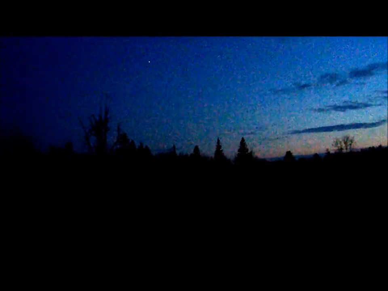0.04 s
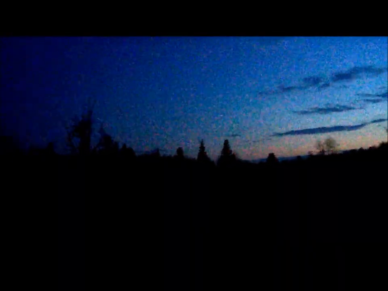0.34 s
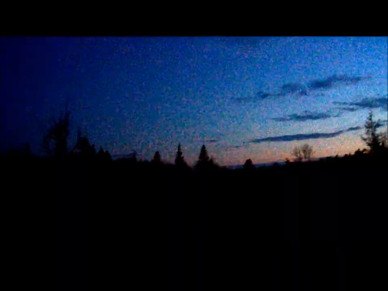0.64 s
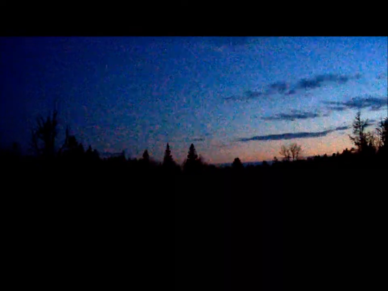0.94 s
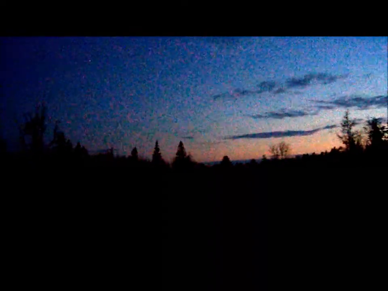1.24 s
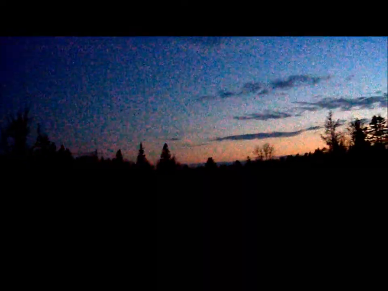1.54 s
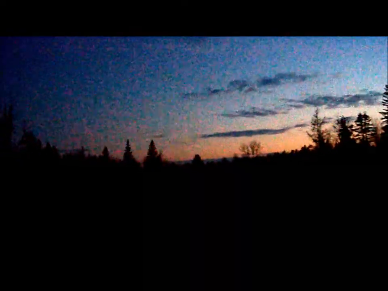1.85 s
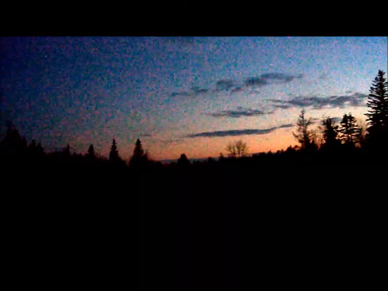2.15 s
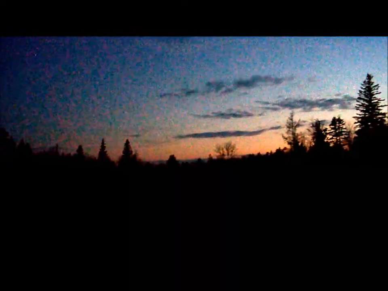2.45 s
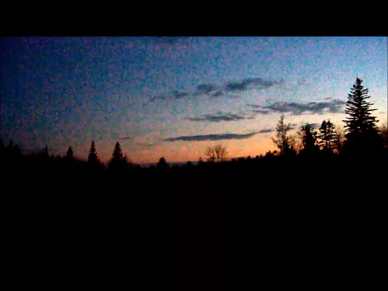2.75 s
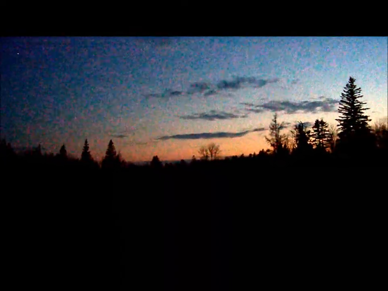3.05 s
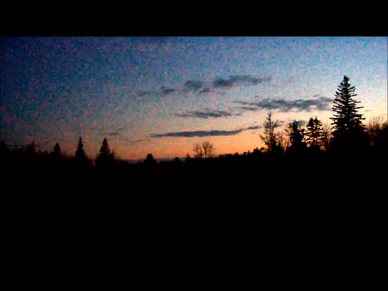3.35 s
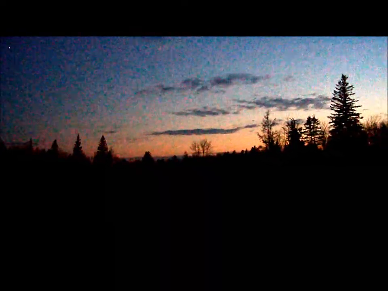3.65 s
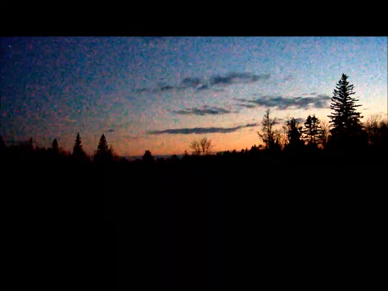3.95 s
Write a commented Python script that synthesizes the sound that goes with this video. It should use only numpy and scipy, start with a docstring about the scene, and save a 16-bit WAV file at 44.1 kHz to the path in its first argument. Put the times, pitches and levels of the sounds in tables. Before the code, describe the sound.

One close frog peeps, with distant frogs answering and wind rumbling on the microphone.

```python
"""Spring peepers in a wetland at dusk

One frog is close: each peep is a pure rising whistle that flutters against its echoes and
lingers among the trees. Others answer from farther off, over a distant chorus. Wind buffets
each microphone port separately, above a soft hiss and faint electrical ticking."""
import sys
import numpy as np
from scipy import signal
from scipy.io import wavfile

SR = 44100
rng = np.random.default_rng(int(sys.argv[2]) if len(sys.argv) > 2 else 0)


def output_pcm(signal):
    """Save a mono or channel-first signal as 16-bit PCM at the path in sys.argv[1].

    Samples are clipped to [-1, 1] before scaling.
    """
    pcm = np.clip(np.atleast_2d(signal).T, -1, 1) * 32767
    wavfile.write(sys.argv[1], SR, np.round(pcm).astype(np.int16))


N = 176400
T = np.arange(N) / SR
CUTOFF_HZ = 7600


def from_db(db):
    """Decibels to gain."""
    return 10 ** (np.asarray(db) / 20)


def unit_rms(x):
    """Scale to unit rms."""
    return x / np.sqrt(np.mean(np.abs(x) ** 2) + 1e-20)


def gain_at(spectrum, hz):
    """Gain of a dB spectrum, interpolated in log frequency."""
    freq_hz, db = np.transpose(spectrum)
    return from_db(np.interp(np.log(hz), np.log(freq_hz), db))


def band_noise(low_hz, high_hz, order=2):
    """White noise through a settled band-pass."""
    sos = signal.butter(order, [low_hz, high_hz], "band", fs=SR, output="sos")
    return signal.sosfilt(sos, rng.standard_normal(N + SR // 4))[-N:]


def drift(rate_hz):
    """Slow random wander, unit rms."""
    sos = signal.butter(2, rate_hz, fs=SR, output="sos")
    return unit_rms(signal.sosfilt(sos, rng.standard_normal(N + SR))[-N:])


def add(out, start_s, sound):
    """Mix a sound in at start_s."""
    i = int(start_s * SR)
    part = sound[:max(out.shape[-1] - i, 0)]
    out[i:i + len(part)] += part


# Wind strength per port: time_s, level_db
GUSTS_LEFT = [(0, -28), (0.2, -28), (0.32, -31.5), (0.44, -33), (0.55, -28), (0.75, -28.5), (0.9, -27.5),
              (1.3, -30.5), (1.48, -26), (1.7, -27), (1.87, -23.5), (2.05, -27), (2.4, -28.5), (2.6, -28),
              (2.95, -26), (3.32, -31), (3.68, -31.5), (4, -31)]
GUSTS_RIGHT = [(0, -38), (0.12, -37), (0.25, -28.5), (0.55, -31.5), (0.64, -37), (1.0, -28), (1.22, -35.5),
               (1.4, -36), (1.6, -35.5), (1.9, -29.5), (2.08, -36), (2.3, -34), (2.45, -39), (2.9, -38.5),
               (3.4, -33.5), (3.55, -43.5), (3.85, -41.5), (4, -28)]
# Rumble spectrum per port: freq_hz, relative_density_db
RUMBLE_SPECTRUM_LEFT = [(20, 5.5), (50, 4.5), (110, 0), (160, -7), (210, -16.5), (260, -20), (370, -29),
                        (500, -41), (1000, -64)]
RUMBLE_SPECTRUM_RIGHT = [(20, -0.5), (50, -6.5), (80, -8.5), (120, -26.5), (180, -36), (260, -38.5),
                         (400, -52), (1000, -80)]


def wind(gusts, spectrum, lump_db=1.99, brighten_per_octave=0.36):
    """Lumpy rumble at one port, brighter when the gust is strong."""
    gust_db = np.interp(T, *np.transpose(gusts))
    swing_db = gust_db - gust_db.mean() + lump_db * drift(rate_hz=18.4)
    edges_hz = 18 * 2 ** (np.arange(19) / 3)
    steady, gusting = 0, 0
    for low_hz, high_hz in zip(edges_hz, edges_hz[1:]):
        centre_hz = np.sqrt(low_hz * high_hz)
        band = gain_at(spectrum, centre_hz) * band_noise(low_hz, high_hz, order=3)
        sensitivity = 1.5 + brighten_per_octave * np.log2(centre_hz / 100)
        steady += band
        gusting += band * from_db(swing_db * sensitivity)
    return from_db(gust_db.mean()) * gusting / steady.std()


# Noise floor: freq_hz, relative_density_db
HISS_SPECTRUM = [(250, -6.5), (390, 2), (600, 1.5), (850, 0.5), (1100, -1.5), (1500, -4.5), (2300, -7),
                 (3600, -8), (5500, -11.5), (7200, -14), (9000, -26)]


def hiss(left_db=-57, right_db=-57.5, shared_power=0.41):
    """Still air and the recorder's own noise, partly shared by the ports."""
    edges_hz = 250 * 2 ** (np.arange(12) / 2)
    noises = np.zeros((3, N))
    for noise in noises:
        for low_hz, high_hz in zip(edges_hz, edges_hz[1:]):
            noise += gain_at(HISS_SPECTRUM, np.sqrt(low_hz * high_hz)) * band_noise(low_hz, high_hz)
    shared, left, right = map(unit_rms, noises)
    ports = np.sqrt(shared_power) * shared + np.sqrt(1 - shared_power) * np.array([left, right])
    return from_db([[left_db], [right_db]]) * ports


# Whistle overtones: pitch_ratio, level_db
PEEP_OVERTONES = [(1.5, -32), (2, -37.5)]


def peep(length_s, start_hz, end_hz, swell_db=1.5, attack_s=0.0088, release_s=0.044, waver_hz=6.1):
    """A frog's rising whistle as a phasor; the fundamental swells, the faint overtones hold."""
    t = np.arange(int((length_s + release_s / 2) * SR)) / SR
    progress = np.minimum(t / length_s, 1)
    ease = 0.29 * (np.sin(progress * np.pi / 2) ** 2 - progress)
    arch = 0.35 * progress * (1 - progress)   # steeper early on
    glide_hz = start_hz + (end_hz - start_hz) * (progress + ease + arch)
    waver = np.interp(progress, np.linspace(0, 1, 20), rng.standard_normal(20))
    phase = 2 * np.pi * np.cumsum(glide_hz + waver_hz * waver) / SR
    envelope = np.minimum(t / attack_s, 1) * np.minimum((t[-1] - t) / release_s, 1)
    fundamental = from_db(-swell_db * (1 - progress) ** 2) * np.exp(1j * phase)
    overtones = sum(from_db(db) * np.exp(1j * ratio * phase) for ratio, db in PEEP_OVERTONES)
    return np.sqrt(2) * envelope * (fundamental + overtones)


def at_ports(call, left_lead_cycles=0.34, right_db=-4.5):
    """A whistle reaches the right port weaker and out of phase."""
    return np.real([call, from_db(right_db) * call * np.exp(-2j * np.pi * left_lead_cycles)])


def tree_scatter(calls, early_t60_s=0.16, late_t60_s=1.3, late_db=-9, build_s=0.011, right_db=-6.5):
    """Scatter from the trees: a quick decay, then a long faint one, different at each port."""
    t = np.arange(SR + SR // 2) / SR
    decay = from_db(-60 * t / early_t60_s) + from_db(late_db - 60 * t / late_t60_s)
    onset = 1 - np.exp(-(t / build_s) ** 2)
    tails = rng.standard_normal((2, len(t))) * decay * onset
    wet = [signal.fftconvolve(calls.real, unit_rms(tail) / np.sqrt(len(t))) for tail in tails]
    return np.array(wet)[:, :len(calls)] * from_db([[0], [right_db]])


def chorus(peeps_per_s=28, centre_hz=2908, spread_hz=125, rise_hz=177.6, level_db=-55, direct_db=-7.5):
    """Many distant frogs, heard mostly through the trees."""
    calls = np.zeros(N + SR, complex)   # 1 s lead-in
    count = int(peeps_per_s * len(calls) / SR)
    for slot, (jitter, up, down) in enumerate(rng.random((count, 3))):
        pitch_hz = centre_hz + spread_hz * np.sqrt(6) * (up - down)
        call = peep(length_s=0.0917, start_hz=pitch_hz, end_hz=pitch_hz + rise_hz)
        add(calls, (slot + jitter) / peeps_per_s, call)
    calls = from_db(level_db) * unit_rms(calls)
    return (tree_scatter(calls) + from_db(direct_db) * at_ports(calls))[:, -N:]


# Eddies: peak_s, sigma_s, level_db, low_hz, high_hz, port (0 left, 1 right)
EDDIES = [(0.01, 0.014, -25.5, 90, 235, 0), (0.161, 0.01, -25, 110, 217, 0), (0.239, 0.01, -21, 25, 91, 1),
          (0.329, 0.036, -28, 25, 96, 1), (0.444, 0.023, -25.5, 25, 108.4, 1),
          (.525, 0.0056, -26.5, 25, 185, 1), (0.558, 0.009, -21, 25, 107, 1),
          (0.662, 0.02, -35, 70, 200, 0), (0.888, 0.011, -19, 25, 123, 0),
          (0.966, 0.0085, -22.5, 25, 190, 0), (1.066, 0.0095, -25.5, 25, 138.4, 1),
          (1.191, 0.015, -24.5, 25, 152.5, 0), (1.429, 0.031, -26, 110, 237, 0),
          (1.558, 0.038, -29.5, 110, 281, 0), (1.758, 0.06, -34.5, 110, 244, 0),
          (1.846, 0.034, -24, 70, 275, 0), (1.825, 0.0045, -39, 330, 604, 0),
          (1.859, 0.0048, -39.5, 321, 930, 0), (1.909, 0.032, -26, 25, 100, 1),
          (1.962, 0.004, -18.5, 25, 160, 0), (2.134, 0.014, -19.5, 25, 112.4, 0),
          (2.268, 0.016, -22, 25, 142, 0), (2.328, 0.0035, -17.5, 49.6, 179, 0),
          (2.355, 0.0062, -16, 35, 149.6, 0), (2.528, 0.016, -21, 80, 169, 0),
          (2.608, 0.068, -31, 87.4, 222, 0), (2.864, 0.017, -21.5, 25, 141, 1),
          (2.88, 0.096, -31.5, 89.4, 226, 0), (3.206, 0.032, -23.5, 25, 108, 0),
          (3.27, 0.0052, -18.5, 25, 116, 0), (3.408, 0.0085, -15, 25, 130, 0),
          (3.432, 0.0048, -20, 100, 255, 0), (3.42, 0.013, -45.5, 330, 542, 0),
          (3.784, 0.004, -15, 25, 173, 0), (3.815, 0.012, -20, 25, 163, 0)]


def buffets():
    """Each eddy strikes one port with a short low thud."""
    out = np.zeros((2, N))
    for peak_s, sigma_s, level_db, low_hz, high_hz, port in EDDIES:
        envelope = np.exp(-0.5 * ((T - peak_s) / sigma_s) ** 2)
        thud = envelope * band_noise(low_hz, high_hz, order=4)
        thud *= np.sqrt(np.sum(envelope ** 2) / np.sum(thud ** 2))
        out[int(port)] += from_db(level_db) * thud
    return out


# Far peeps: start_s, length_s, start_hz, end_hz, level_db, direct_gain_db
FAR_CALLS = [(0.044, 0.12, 3100, 3320, -62.5, 2), (0.04, 0.11, 2950, 3200, -62.5, 3.5),
             (0.626, 0.0772, 2884, 3020, -43.5, -4.5), (0.739, 0.059, 3140, 3350, -54.5, -2.5),
             (0.79, 0.08, 2530, 2700, -63.5, 2), (0.81, 0.092, 3110, 3280, -62, -3),
             (1.08, .08, 2727, 2950, -62, -5), (1.298, .1, 3066, 3170, -61.5, 3.5),
             (1.514, 0.068, 2884, 3030, -41, -10), (1.78, .09, 3026, 3220, -59, 4.5),
             (1.9, 0.079, 3150, 3350, -60, 3), (2.02, 0.093, 2660, 2900, -59.5, 4),
             (2.186, 0.072, 3210, 3330, -63, -1), (2.354, 0.075, 2907, 3050, -45.5, -2),
             (2.598, 0.09, 2580, 2690, -68, 2.5), (2.621, 0.11, 3085, 3260, -62.5, 1.5),
             (2.656, 0.077, 2880, 3080, -58, 3), (2.962, 0.053, 3130, 3310, -61.5, 5),
             (3.171, 0.064, 2935, 3090, -43, -1.5), (3.41, 0.12, 2540, 2680, -65, 3),
             (3.48, 0.085, 2925, 3080, -55, 3.5), (3.721, 0.12, 3034, 3250, -54.5, -1.5),
             (3.943, 0.075, 2950, 3110, -41.5, -2.5)]


def far_frogs(scatter_db=-0.5):
    """Answering peeps, half lost in the scatter; some arrive by a clearer path."""
    calls, direct = np.zeros((2, N), complex)
    for start_s, length_s, start_hz, end_hz, level_db, direct_gain_db in FAR_CALLS:
        call = from_db(level_db) * peep(length_s, start_hz, end_hz)
        add(calls, start_s, call)
        add(direct, start_s, from_db(direct_gain_db) * call)
    return at_ports(direct) + from_db(scatter_db) * tree_scatter(calls)


def ticking(rate_hz=30.03, offset_s=0.042, sigma_s=0.00069, level_db=-63, low_hz=2900):
    """Tiny regular bursts of hiss from the camera's electronics."""
    from_tick_s = (((T - offset_s) * rate_hz + 0.5) % 1 - 0.5) / rate_hz
    envelope = np.exp(-0.5 * (from_tick_s / sigma_s) ** 2)
    return from_db(level_db) * envelope * unit_rms(band_noise(low_hz, CUTOFF_HZ))


# Near peeps: start_s, length_s, start_hz, end_hz, level_db, swell_db, left_lead_cycles
NEAR_CALLS = [(0.228, 0.096, 2465, 2720, -33.5, 0, -0.38), (1.484, 0.11, 2485, 2760, -34, -1, -0.42),
              (2.754, .113, 2624, 2909, -24.5, 13, 0.44), (3.82, 0.12, 2686, 2956, -25, 11.5, 0.42)]
# Echoes from ground and trees: delay_s, gain_db
NEAR_ECHOES = [(.017, -21.5), (0.029, -14.5), (.046, -25.5)]


def near_frog(scatter_db=-10.5):
    """Loud peeps that beat against their own echoes."""
    out = np.zeros((2, N))
    for start_s, length_s, start_hz, end_hz, level_db, swell_db, left_lead_cycles in NEAR_CALLS:
        call = from_db(level_db) * peep(length_s, start_hz, end_hz, swell_db)
        arrivals = np.zeros(N, complex)
        add(arrivals, start_s, call)
        scatter = from_db(scatter_db) * tree_scatter(arrivals)
        for delay_s, gain_db in NEAR_ECHOES:
            phase_turn = np.exp(2j * np.pi * rng.random())
            add(arrivals, start_s + delay_s, from_db(gain_db) * call * phase_turn)
        out += at_ports(arrivals, left_lead_cycles) + scatter
    return out


def scene():
    """Wind, hiss and ticking, with frogs near and far."""
    rumble = np.array([from_db(-1) * wind(GUSTS_LEFT, RUMBLE_SPECTRUM_LEFT),
                       from_db(-0.5) * wind(GUSTS_RIGHT, RUMBLE_SPECTRUM_RIGHT)])
    return rumble + buffets() + hiss() + ticking() + near_frog() + far_frogs() + chorus()


# Dips in the microphone's response: centre_hz, q
MIC_NOTCHES = [(298, 1.65), (965, 16)]


def record(dry, grit_db=-32.5):
    """Two microphone dips, recorder noise in proportion to the signal, and a steep treble cut."""
    for centre_hz, q in MIC_NOTCHES:
        dry = signal.lfilter(*signal.iirnotch(centre_hz, q, fs=SR), dry)
    gritty = dry * (1 + from_db(grit_db) * rng.standard_normal(dry.shape))
    return signal.sosfilt(signal.butter(32, CUTOFF_HZ, fs=SR, output="sos"), gritty)


dry = scene()
out = record(dry)
output_pcm(out)
```